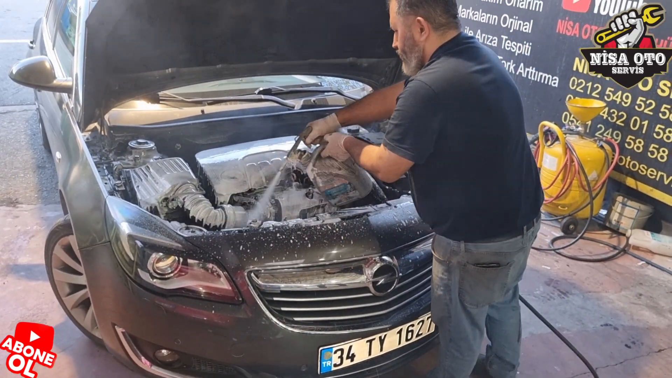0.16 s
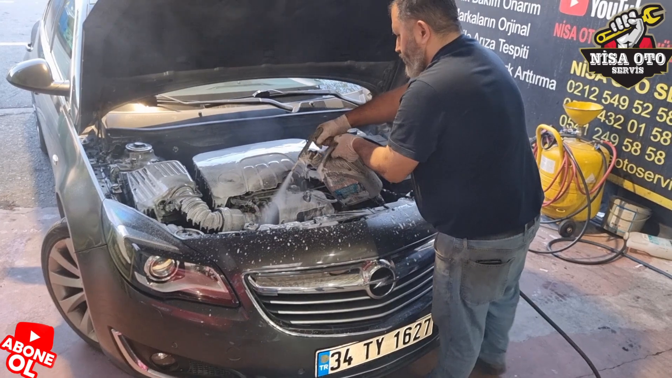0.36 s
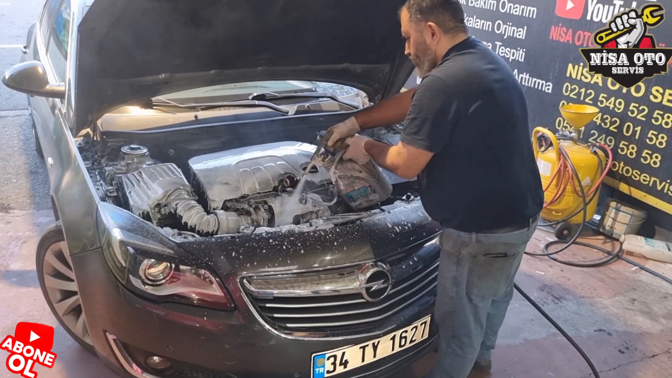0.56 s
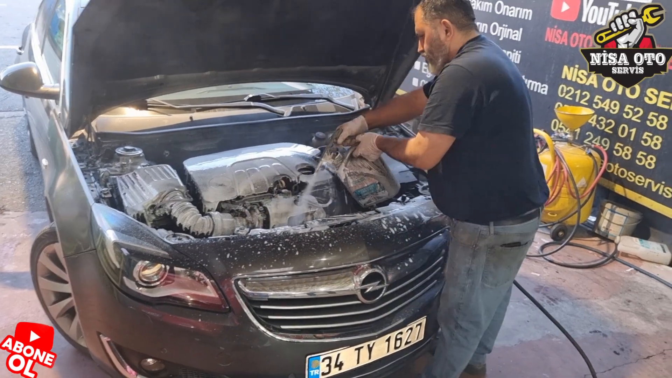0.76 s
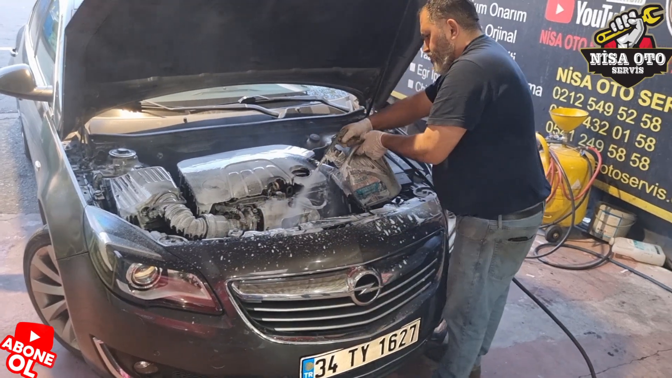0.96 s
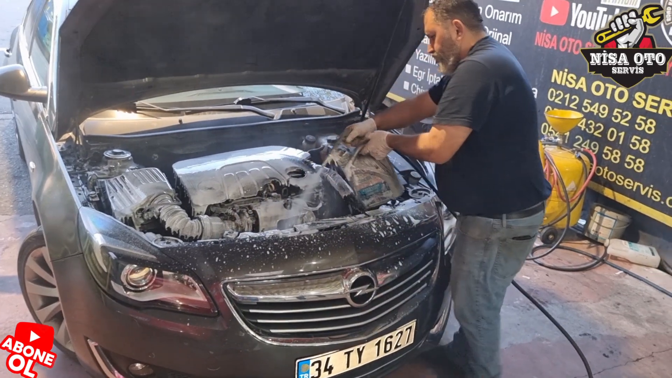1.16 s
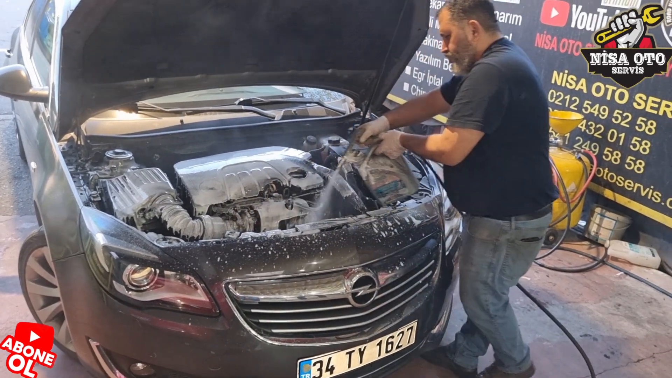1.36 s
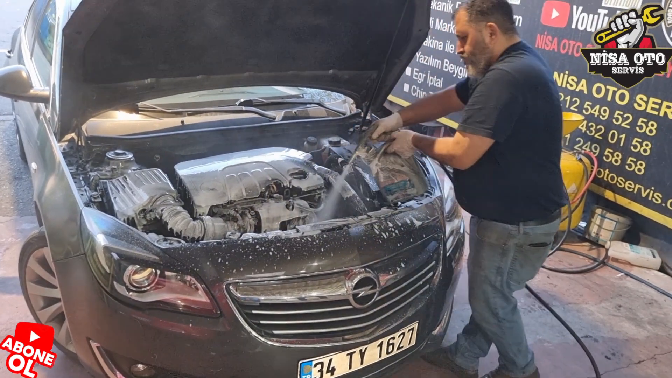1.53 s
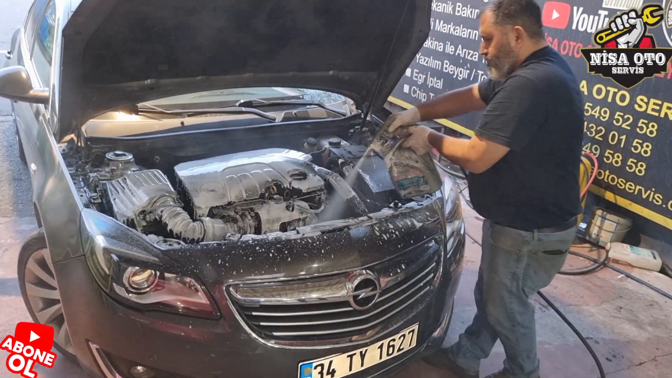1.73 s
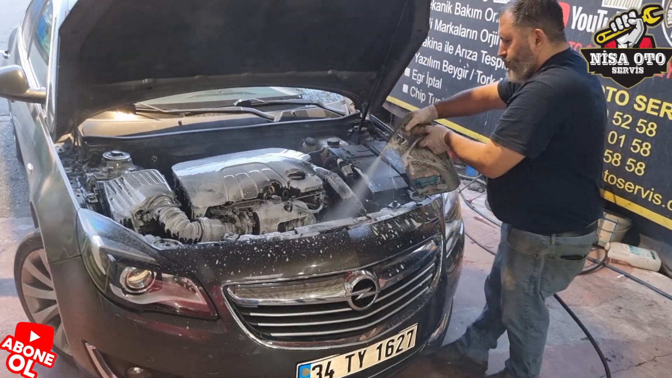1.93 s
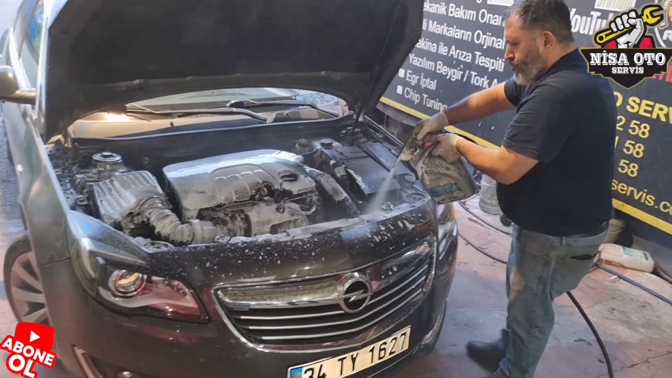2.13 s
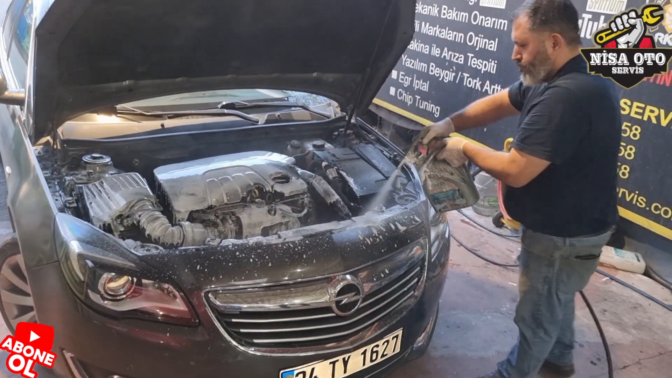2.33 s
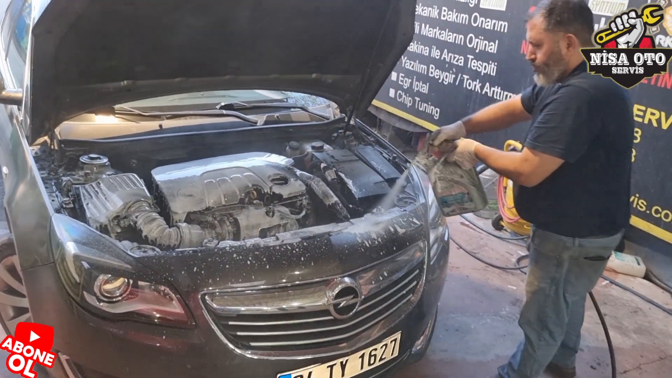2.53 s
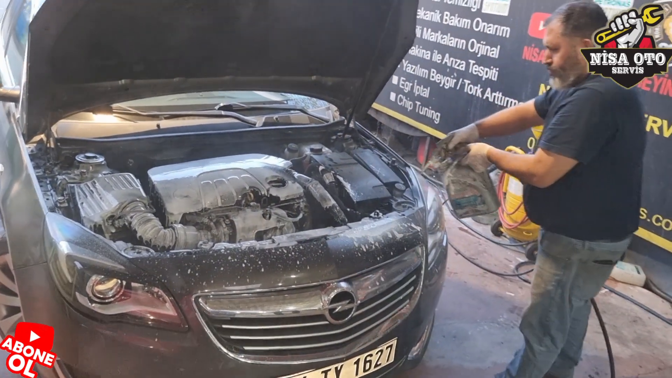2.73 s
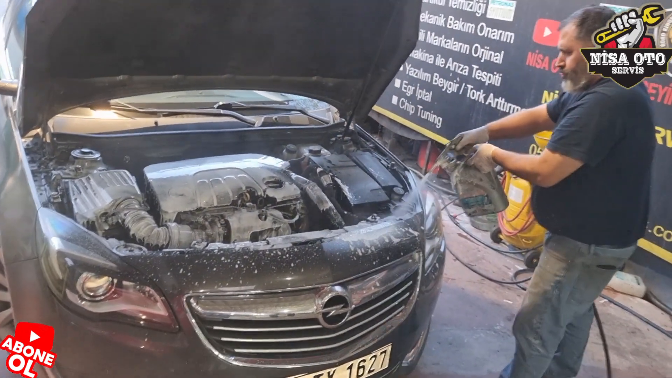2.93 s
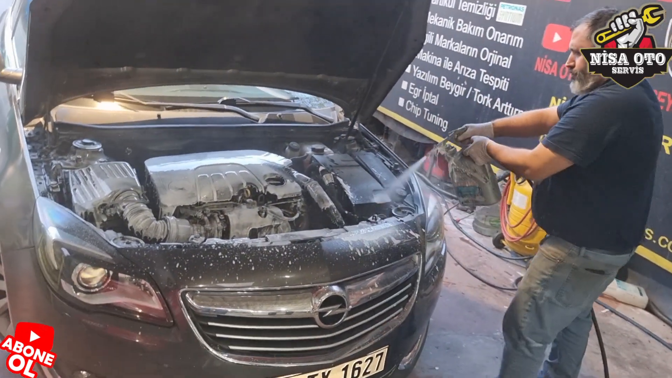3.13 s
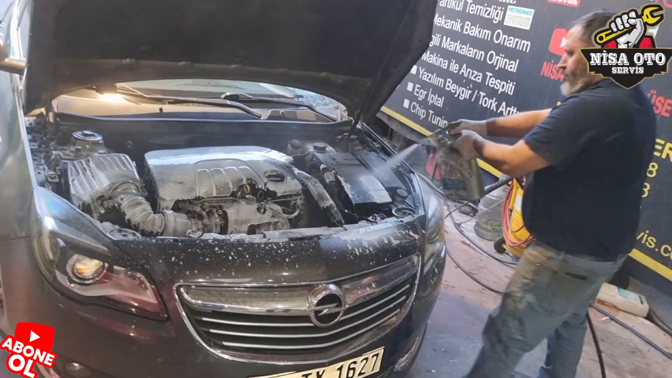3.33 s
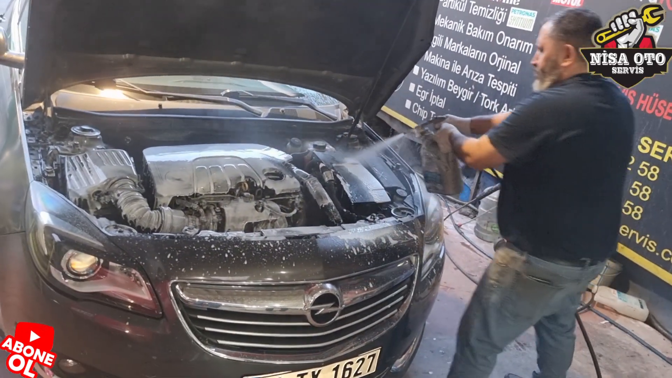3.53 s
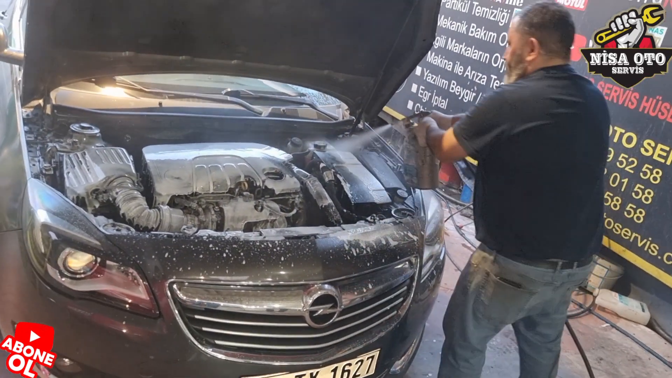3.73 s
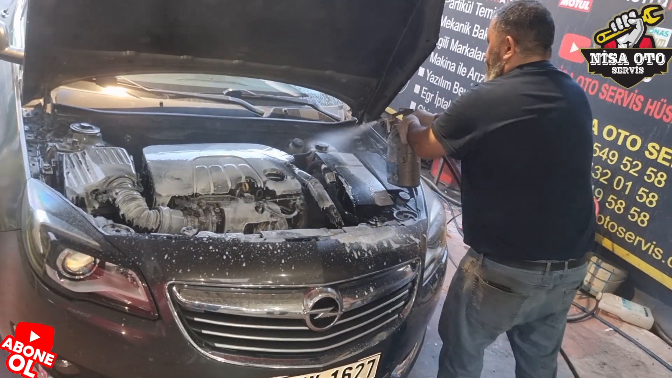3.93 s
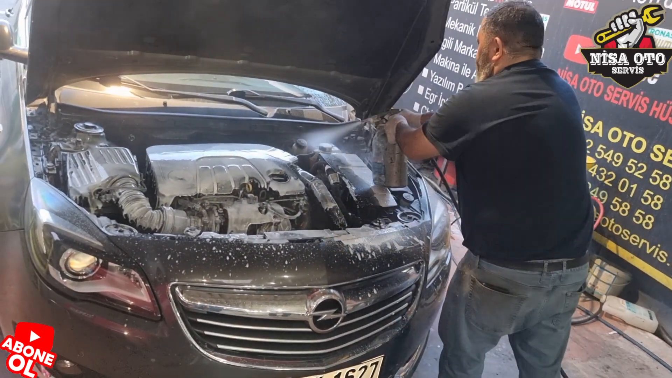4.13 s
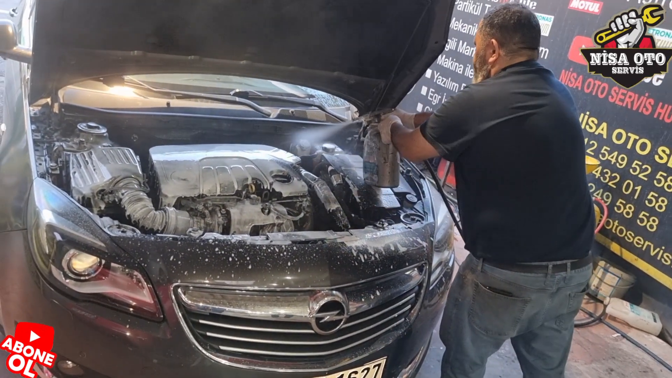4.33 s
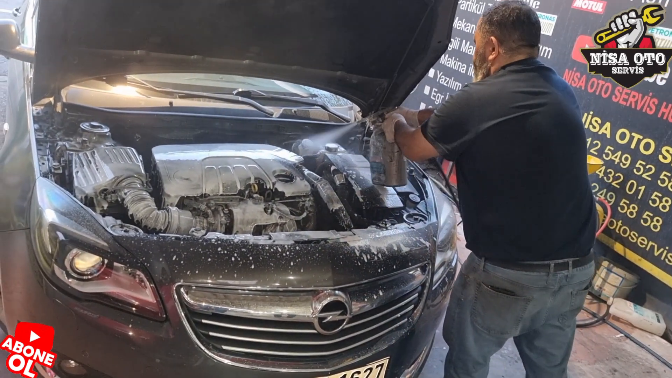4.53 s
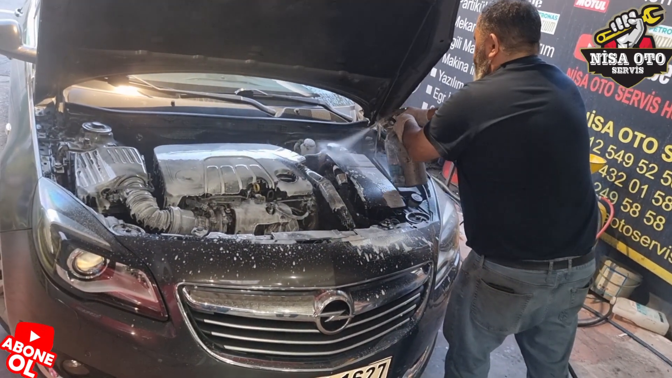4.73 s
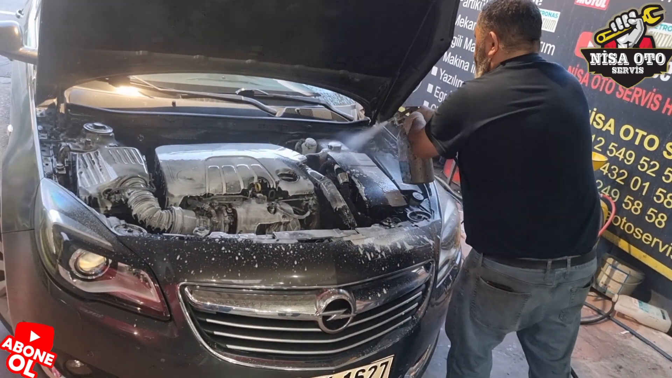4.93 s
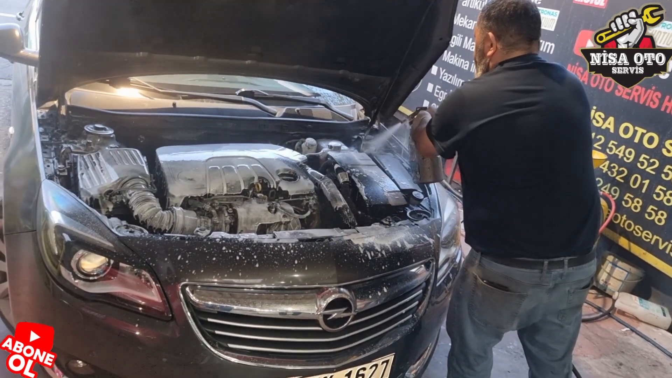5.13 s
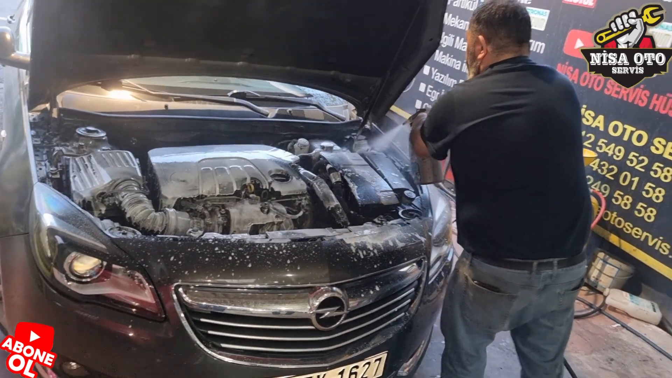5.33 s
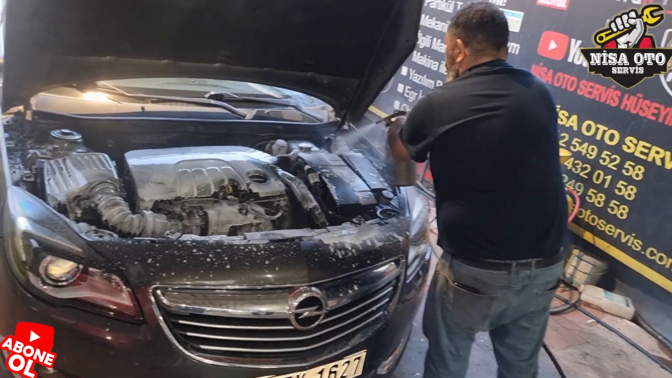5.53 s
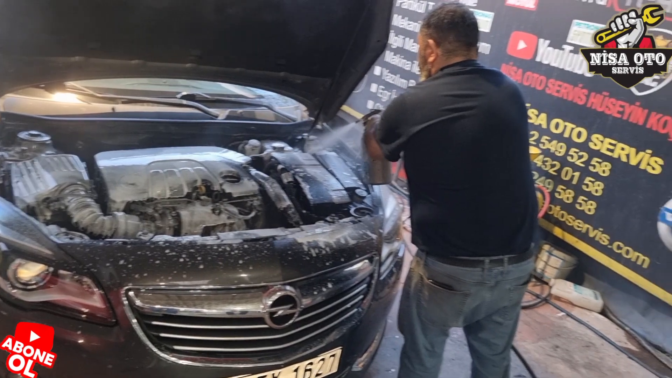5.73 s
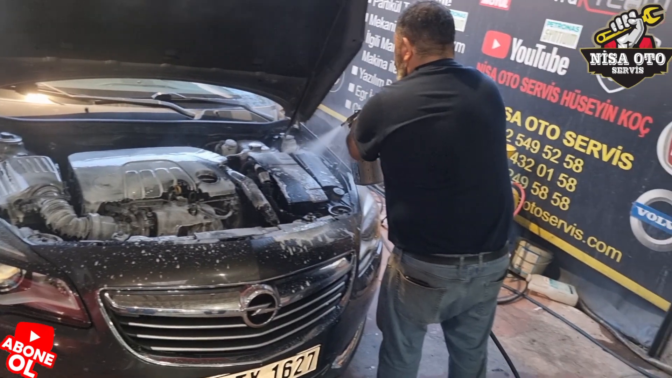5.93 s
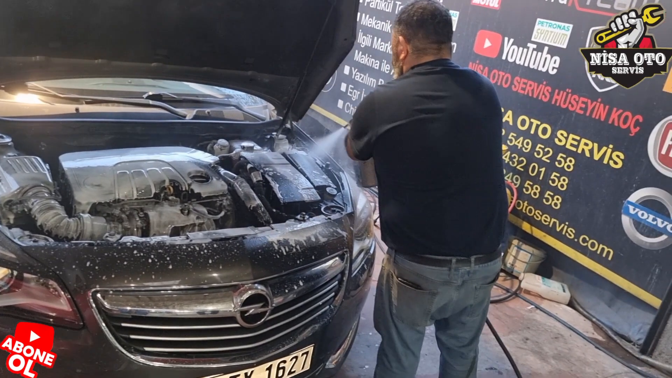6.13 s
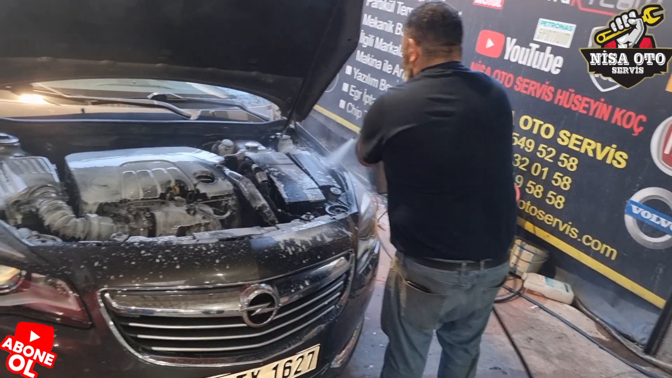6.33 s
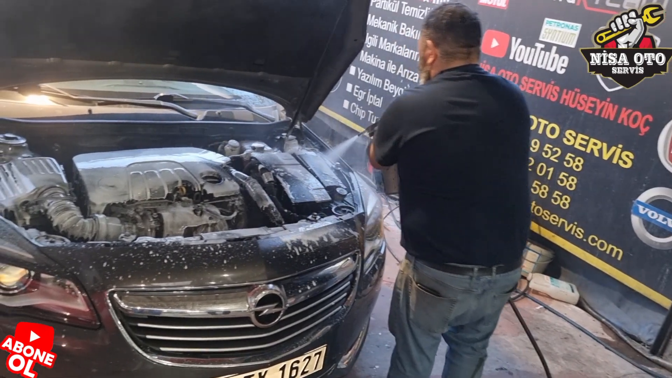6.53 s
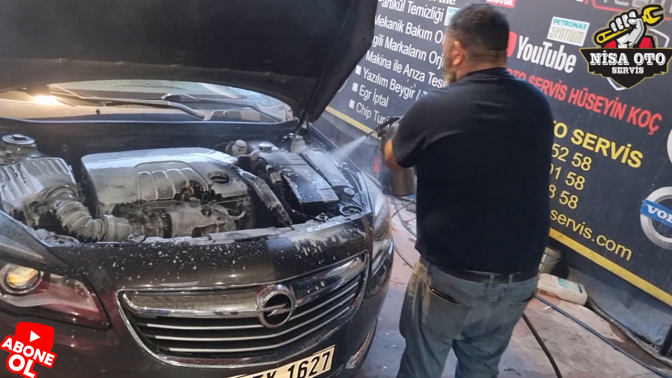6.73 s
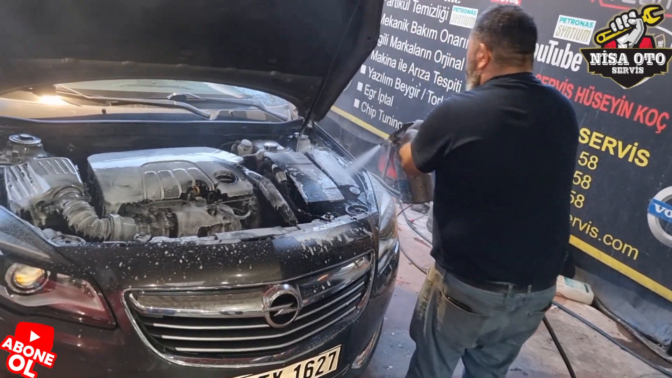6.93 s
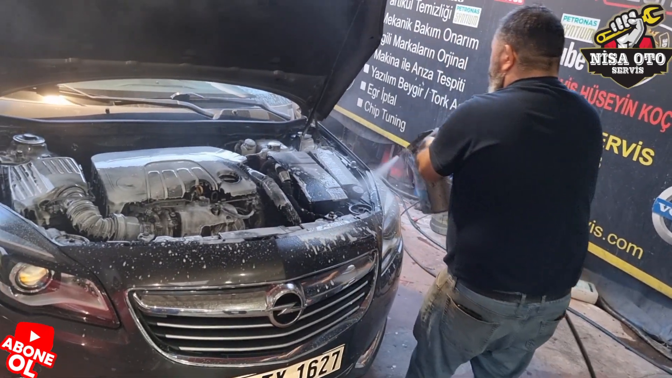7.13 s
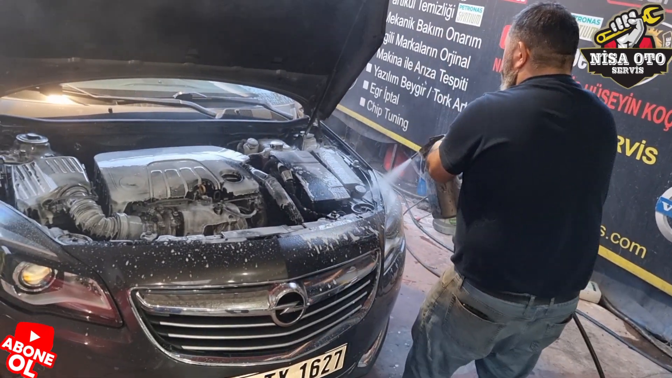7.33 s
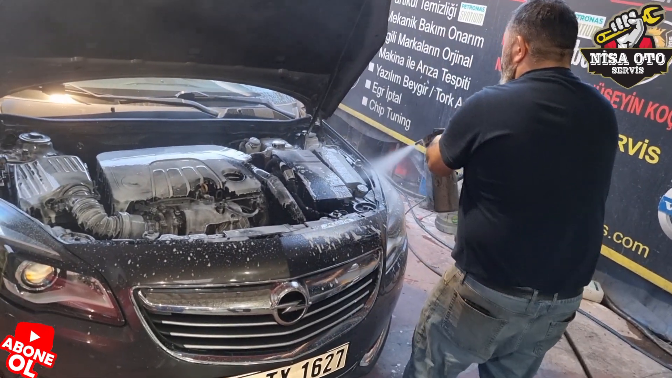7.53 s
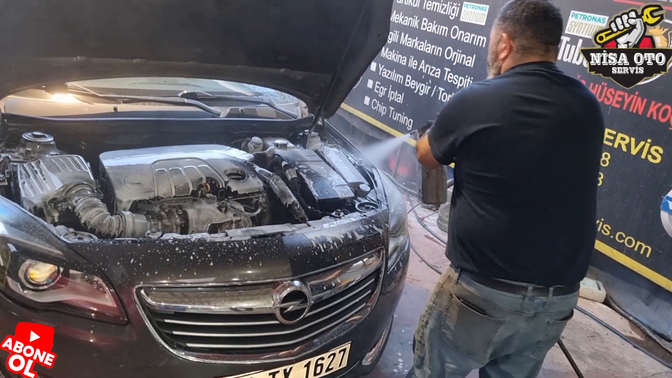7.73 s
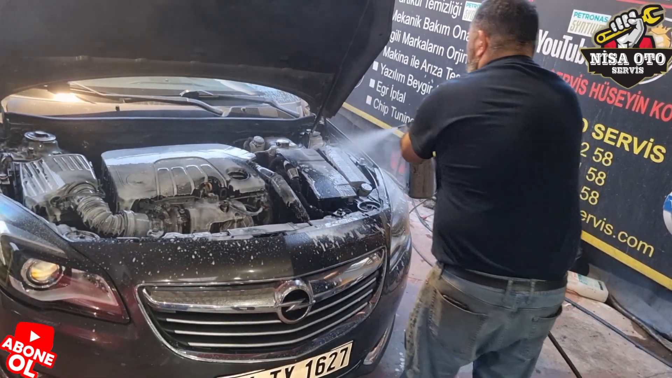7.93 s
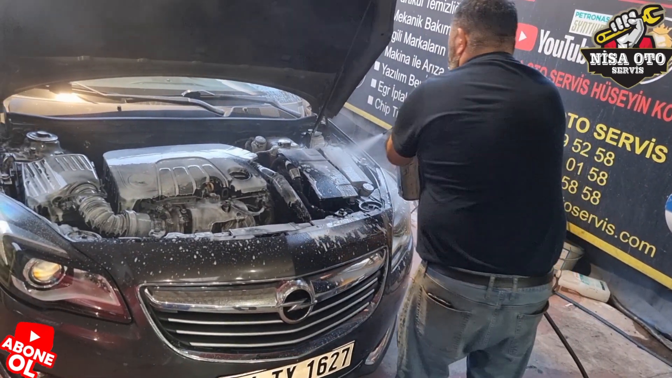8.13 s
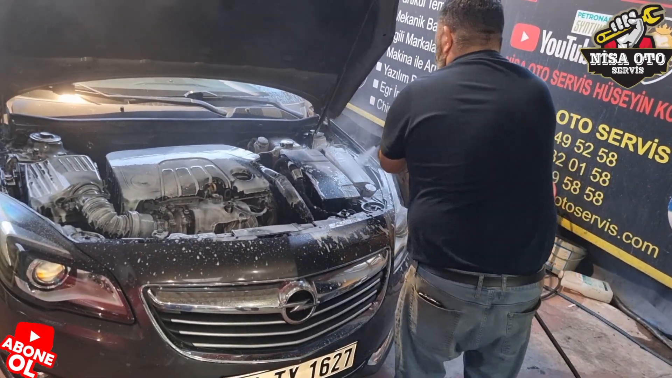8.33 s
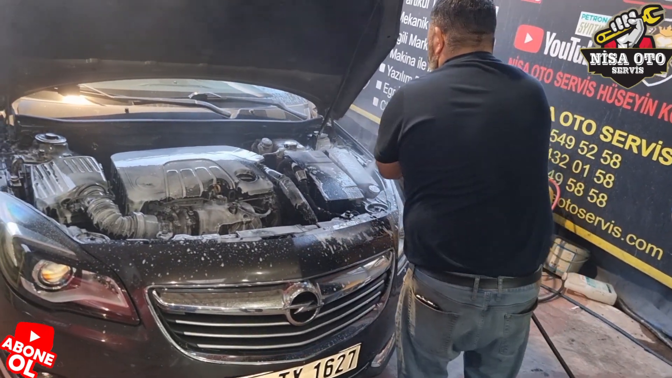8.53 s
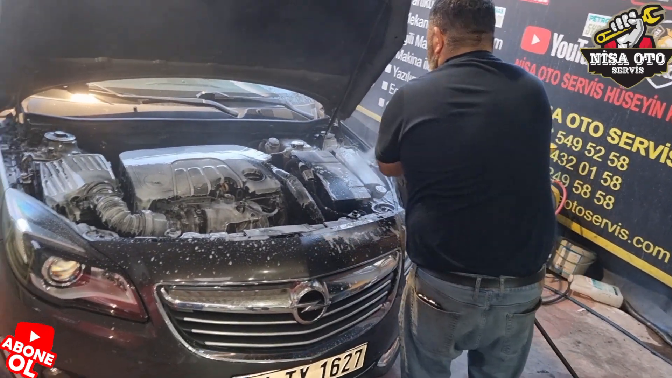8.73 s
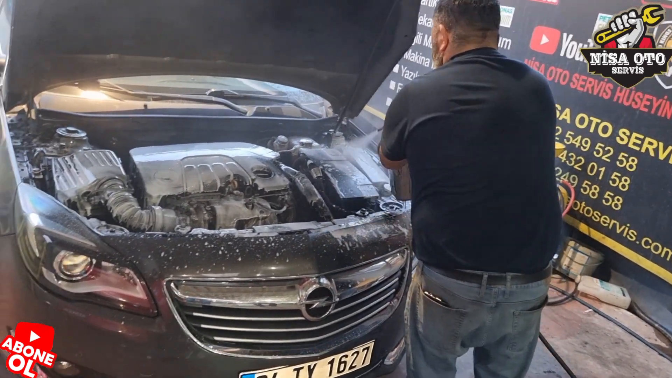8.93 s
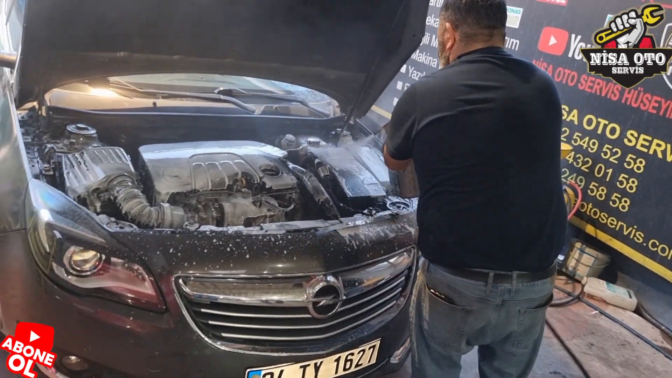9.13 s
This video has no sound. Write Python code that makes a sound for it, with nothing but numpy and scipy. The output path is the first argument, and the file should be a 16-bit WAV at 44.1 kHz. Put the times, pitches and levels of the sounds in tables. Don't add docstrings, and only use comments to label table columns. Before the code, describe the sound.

From 0 s a pressure sprayer hisses loudly and brightly, a broad airy jet with slight flicker and drifting coloration as the hand sweeps; droplets drum dully on engine covers. At about 0.3-1 s a vehicle engine throbs past with a low roar and slight panel rattle. Around 2 s the jet faintly rings a cover. At 2.7 s the trigger is let go: the hiss drops away for under two tenths of a second, leaving wall echo and distant rumble, then snaps back at 2.9 s with a small hollow pop and a brief swell. From 3 s the hiss is somewhat softer. At 3.8 s a short hollow, boxy gust sounds, followed by a very faint low pipe tone until about 5.3 s. Spray continues unbroken, gently changing brightness, over uneven street rumble. Near 9.16 s the tank softly thuds against bodywork. Stereo phone, a few steps away, before a garage.

```python
import sys
import numpy as np
from scipy import signal
from scipy.io import wavfile

SR = 44100
rng = np.random.default_rng(int(sys.argv[2]) if len(sys.argv) > 2 else 0)


def boost_factor(decibels):
    exponent = np.asarray(decibels, float) / 20
    return 10 ** exponent


def to_wav(s):
    ch = np.atleast_2d(s).T
    pcm = np.round(np.clip(ch, -1, 1) * 32767)
    wavfile.write(sys.argv[1], SR, pcm.astype(np.int16))


N = 408366

# f/Hz, density/dB
HISS_SPECTRUM = [(1000, -12), (1500, -10), (1750, -7), (2100, 0.5), (2500, 1.5), (3000, -0.3), (4000, 1.5),
                 (5300, 1.4), (5900, 0), (7600, -1.5), (8500, -6.5), (10500, -8), (12500, -6),
                 (15700, -4.5)]
# f/Hz, left-right/dB
HISS_BALANCE = [(1200, -1), (1700, -4), (2600, -2), (4500, -7.5), (6300, 2), (7000, 1), (9000, 2.5),
                (11500, -0.5), (12500, -1.5), (15500, -5)]
# t/s, pressure/dB, aim into bay/dB, turn to left/dB, lower bay echo f/Hz
HAND_SWEEP = [(0.0, 3.5, -1, .5, 3700), (0.7, 4, -2, 0, 3700), (1.2, 4, -3, 0.8, 3780),
              (1.65, 3, -0.9, 0.3, 3640), (2.1, 3.5, -1, 0, 4100), (2.5, 4, -1.5, -0.5, 3500),
              (3.1, 0.5, -1.5, 1, 4060), (3.65, .5, -1, 0.1, 3470), (4.3, 0, -1.5, 0, 3560),
              (4.66, 1.5, -2.5, .5, 3840), (5.06, 0, 1.5, -0.5, 4000), (5.3, 0, -0.3, 0.5, 3930),
              (5.65, 0, 0.5, 0.2, 3750), (6.1, .5, -1.9, 1.5, 3920), (6.8, 1, 0, 1, 3540),
              (7.6, 0.66, -1.7, 0, 3770), (8.45, 0, 2, 0, 4200), (8.75, 0, -0.5, -.4, 3940)]
# t/s, level/dB
LATE_SWELL = [
    (2.86, 0.5),
    (2.90, -2),
    (2.95, 3),
    (3.08, -1.5),
]


def jet():
    level_db, upper_echo_hz, echo_drift_hz = -12.5, 5100, 120
    t, hz = grid(size=1024)
    shape = len(t), len(hz)
    pressure_db, aim_db, pan_db, lower_echo_hz = follow(HAND_SWEEP, t)[:, :, None]
    aim_db = aim_db + 0.32 * wander(t, 8.1)[:, None]
    throat_db = -1.33 * aim_db + follow(LATE_SWELL, t, 0)[0][:, None]
    sputter_db = 0.6 * wander(t, 14.1)[:, None]
    fizz_db = -1.14 * aim_db + sputter_db

    field_db = read(HISS_SPECTRUM, hz) + pressure_db + aim_db
    field_db -= 10 * np.log10(1 + (1300 / (hz + 1)) ** 6)
    for echo_hz in (lower_echo_hz, upper_echo_hz):
        centre_hz = echo_hz + echo_drift_hz * wander(t, 4.1)[:, None]
        field_db += 2.25 * np.exp(-((hz - centre_hz) / 220) ** 2)
    field_db += throat_db / (1 + (hz / 2900) ** 8)
    field_db += fizz_db / (1 + (7600 / (hz + 1)) ** 8)

    streaks = patches(shape, 38, 2.6)
    field_db += 3.2 * np.maximum(streaks, 0.3 * streaks) / (1 + (hz / 16000) ** 2)
    field_db += 0.4 * patches(shape, 25, 18)
    field_db += 0.5 * patches(shape, 5.2, 860) * (hz / 8000) ** 0.5

    lag_s = 3 / SR + 1.73 * patches(shape, 74, 7.55) / (2 * np.pi * hz + 1)
    lean_db = read(HISS_BALANCE, hz) + pan_db + 1.4 * patches(shape, 40, 6)
    return evened(noise(field_db, 0.7, lean_db, lag_s, size=1024)) * boost_factor(level_db)


# t/s, level/dB
SPLASH_LEVEL = [(0.1, -33), (1.2, -32.5), (1.8, -33.5), (2.15, -31), (2.5, -33.5), (3.5, -37.5),
                (4.2, -32.5), (4.6, -35), (6.0, -37), (7.3, -37.5), (8.4, -34.5), (8.9, -36.5),
                (9.1, -33.5)]
# f/Hz, density/dB
SPLASH_SPECTRUM = [(80, -2), (130, 5.5), (300, 4), (430, -4), (550, -2), (700, -0.5), (900, -2), (1250, 1),
                   (1500, -6.5), (1900, -28), (3000, -50)]


def splash():
    t, hz = grid(size=2048)
    level_db = follow(SPLASH_LEVEL, t)[0][:, None]
    thud_db = -9.5 + 1.1 * wander(t, 3.1)[:, None]
    colour_db = read(SPLASH_SPECTRUM, hz)
    middle = (hz > 450) & (hz < 1400)
    colour_db -= 10 * np.log10(np.sum(boost_factor(2 * colour_db)[middle]))
    field_db = colour_db + level_db + thud_db / (1 + (hz / 400) ** 6)
    field_db += 2.93 * patches((len(t), len(hz)), 53, 4.2)
    same = 1.1 / (1 + (hz / 380) ** 3)
    return noise(field_db, same, -0.77, 0, size=2048)


def hollow(rows, modes, same):
    drive = rng.standard_normal((2, N))
    drive[1] = same * drive[0] + np.sqrt(1 - same ** 2) * drive[1]
    ring = sum(boost_factor(db) * evened(resonate(drive, hz, width_hz)) for hz, width_hz, db in modes)
    t = np.arange(N) / SR
    return evened(ring) * sum(shaped(row, t) for row in rows)


# t/s, rise/s, hold/s, level/dB, fade/(dB/s)
BOX_GUSTS = [
    (3.776, 0.037, 0.098, -20.5, 80),
]
PIPE_GUSTS = [
    (3.77, 0.038, 0.093, -26, 70),
    (4.1, 0.21, 1.0, -52, 150),
]
CAP_GUSTS = [
    (2.955, .02, .055, -31, 400),
    (3.06, .01, .03, -44, 200),
]
COVER_GUSTS = [
    (2.02, .012, .03, -31.5, 70),
    (2.1, 0.096, .44, -40, 300),
    (9.04, .05, 0.074, -36, 120),
]
# t/s, rise/s, hold/s, level/dB, fade/(dB/s)
PIPE_HUM = (3.95, .1, 1.25, -48, 120)
# f/Hz, width/Hz, level/dB
BOX_AIR = [(130, 30, -9), (421, 29, -4), (655, 13, -7), (785, 20, -12), (853, 15, -9), (978, 8.3, -2),
           (991, 12, -8), (1195, 6, 3.5), (1340, 20, -7), (686, 610, 4)]
PIPE_AIR = [(278.6, 5, 4), (290, 95, 1.5)]
CAP_AIR = [(391, 39, 11), (350, 24, 1)]
COVER_AIR = [(1245, 100, 0)]


def hollow_parts():
    parts = hollow(BOX_GUSTS, BOX_AIR, 0.089)
    parts += hollow(PIPE_GUSTS, PIPE_AIR, 0.95)
    parts += hollow(CAP_GUSTS, CAP_AIR, 0.65)
    parts += 0.76 * hollow(COVER_GUSTS, COVER_AIR, 0.5)
    t, hum_hz = np.arange(N) / SR, 278.5
    return parts + shaped(PIPE_HUM, t) * np.sqrt(2) * np.sin(2 * np.pi * hum_hz * t)


# t/s, rise/s, hold/s, level/dB, fade/(dB/s)
ENGINE_PASS = [
    (0.32, .2, 0.19, -28.5, 55),
    (0.29, 0.047, 0.42, -32.5, 74),
    (0.297, .035, .7, -36, 184),
    (.29, 0.045, 0.049, -27, 60),
]
# multiple, level/dB
ORDERS = [(3, -4), (4, -27), (5, 0), (6, 1), (7, -18), (8, -7), (9, -3), (10, -0.5), (11, -12), (12, 3.5),
          (15, -9), (18, -18), (21, -5)]


def engine():
    firing_hz, rattle_hz = 24, 549.4
    t = np.arange(N) / SR
    turns = firing_hz * t + 0.024 * evened(resonate(rng.standard_normal(N), 5.0, 7.1))
    orders = [boost_factor(db) * np.cos(2 * np.pi * (k * turns + rng.random())) for k, db in ORDERS]
    boom = evened(resonate(rng.standard_normal((2, N)), 240, 720))
    roar = evened(resonate(rng.standard_normal((2, N)), 700, 600))
    rattle = evened(resonate(rng.standard_normal(N), rattle_hz, 15))
    rattle = rattle + 0.47 * np.sin(2 * np.pi * rattle_hz * t)
    low, upper, panel, exhaust = (shaped(row, t) for row in ENGINE_PASS)
    firing = low * (1.15 * evened(sum(orders[:4])) + 0.36 * boom)
    firing = firing + upper * (1.1 * evened(sum(orders[4:])) + 0.85 * boom)
    return firing + panel * evened(rattle) + exhaust * roar


# f/Hz, peak/dB, t60/s
BODYWORK = [(178, -25, 0.11), (320, -21, .08), (455, -27, .07)]


def knock():
    t = np.maximum(np.arange(N) / SR - 9.158, 0)
    ring = 0
    for k, (hz, db, t60_s) in enumerate(BODYWORK):
        ring = ring + (-1) ** k * boost_factor(db - 60 * t / t60_s) * np.sin(2 * np.pi * hz * t)
    return ring * (1 - np.exp(-t / 0.0035))


# f/Hz, t60/s
WALL_DECAY = [(300, 0.79), (1000, 1.1), (2200, 1.43), (4000, 0.74), (8000, 0.49), (15000, 0.14)]


def walls(x):
    hz, t, z = signal.stft(rng.standard_normal((2, SR)), SR, nperseg=256)
    t60_s = read(WALL_DECAY, hz)[:, None]
    tail = signal.istft(z * boost_factor(-60 * t / t60_s) / np.sqrt(t60_s), SR, nperseg=256)[1]
    tail = np.pad(tail / np.linalg.norm(tail[0]), ((0, 0), (500, 0)))
    return signal.fftconvolve(x, tail, axes=1)[:, :N]


# f/Hz, density/dB
STREET_SPECTRUM = [(12, -58), (20, -28), (41, -10), (64, 12), (82, 5.5), (108, -14.5), (209, -3),
                   (236, -11), (300, -10.5), (390, -34), (660, -120)]
YARD_SPECTRUM = [(59, -52), (100, 5), (119, -10), (444, -15.5), (501, -13.5), (585, -21), (1400, -30),
                 (1820, -66), (3080, -120)]
# t/s, rise/s, hold/s, level/dB, fade/(dB/s)
TRAFFIC_SWELLS = [(.0, 0.041, .1, -39, 40), (.4, .15, 0.33, -35.5, 60), (2.65, .1, 0.39, -47, 42),
                  (3.778, .04, 0.23, -38, 93), (4.9, .05, 0.25, -40.5, 68), (6.495, 0.062, 0.65, -42, 40),
                  (8.28, .05, .1, -50, 52), (9.18, .03, .1, -38, 64)]


def street():
    street_db, yard_db, lump_db = -42, -51.5, 2.4
    frame_s, hz = grid(size=4096)

    def steady(spectrum):
        field_db = np.tile(read(spectrum, hz), (len(frame_s), 1))
        return evened(noise(field_db, 0.86, 0.68, 0, size=4096))

    t = np.arange(N) / SR
    level = boost_factor(street_db) + sum(shaped(row, t) for row in TRAFFIC_SWELLS)
    lumps_db = lump_db * np.interp(t, t[::256], wander(t[::256], 11.5))
    rumble = steady(STREET_SPECTRUM) * level * boost_factor(lumps_db - 6.0)
    return rumble + boost_factor(yard_db) * steady(YARD_SPECTRUM)


def evened(x):
    return x / np.sqrt(np.mean(abs(x) ** 2) + 1e-20)


def read(points, hz):
    f, value = np.transpose(points)
    return np.interp(np.log(hz + 1), np.log(f + 1), value)


def follow(rows, t, silent=None):
    s, *columns = np.transpose(rows)
    return np.array([np.interp(t, s, c, silent, silent) for c in columns])


def shaped(row, t):
    start_s, rise_s, hold_s, level_db, fade_db_s = row
    fading_s = np.maximum(t - start_s - rise_s - hold_s, 0)
    return np.clip((t - start_s) / rise_s, 0, 1) * boost_factor(level_db - fade_db_s * fading_s)


def wander(t, rate_hz):
    rates_hz = rate_hz * np.geomspace(0.1, 1, num=24)
    return evened(sum(np.sin(2 * np.pi * (f * t + rng.random())) / np.sqrt(f) for f in rates_hz))


def patches(shape, frames, bins):
    field = rng.standard_normal(shape)
    t, f = (np.fft.fftfreq(n) for n in shape)
    blur = np.exp(-(t[:, None] * frames) ** 2 - (f * bins) ** 2)
    return evened(np.fft.ifft2(np.fft.fft2(field) * blur).real)


def grid(size):
    return np.arange(4 * N // size + 5) * size / (4 * SR), np.fft.rfftfreq(size, 1 / SR)


def noise(field_db, same, lean_db, lag_s, size):
    a, b, c, d = np.moveaxis(rng.standard_normal(field_db.shape + (4,)), -1, 0)
    same = np.clip(same, 0, 1)
    left = a + 1j * b
    turn = np.exp(2j * np.pi * np.fft.rfftfreq(size, 1 / SR) * lag_s)
    right = same * left * turn + np.sqrt(1 - same ** 2) * (c + 1j * d)
    z = np.array([left * boost_factor(lean_db / 2), right * boost_factor(-lean_db / 2)]) * boost_factor(field_db)
    return signal.istft(z.swapaxes(1, 2), nperseg=size, noverlap=size * 3 // 4)[1][:, :N]


def resonate(x, hz, width_hz):
    b, a = signal.iirpeak(hz, hz / width_hz, SR)
    return signal.lfilter(b, a, signal.lfilter(b, a, x))


# t/s, flow/dB
TRIGGER_FLOW = [
    (2.664, 2),
    (2.70, -12),
    (2.74, -50),
    (2.862, -47),
    (2.874, -22),
    (2.888, 2.5),
    (2.92, 4),
]


def scene():
    t = np.arange(N) / SR
    flow = boost_factor(follow(TRIGGER_FLOW, t))
    leak = boost_factor(-33)
    spray = jet() * (flow + leak) + splash() * flow * boost_factor(follow(LATE_SWELL, t, 0))
    near = boost_factor(-4.5) * spray + boost_factor(-10.0) * walls(spray)
    return near + hollow_parts() + engine() + knock() + street()


def top_cut(x):
    return signal.sosfilt(signal.butter(12, 17050, fs=SR, output="sos"), x)


def record(dry):
    edge = signal.firwin(511, 15740, window=("kaiser", 9), fs=SR)
    limited = np.clip(dry, -0.91, 0.91)
    mix = signal.oaconvolve(limited, edge[None], "same")
    return top_cut(mix)


dry = scene()
out = record(dry)
to_wav(out)
```